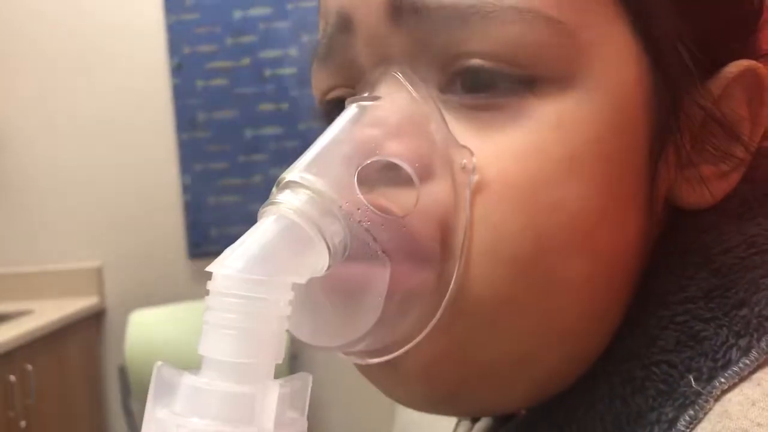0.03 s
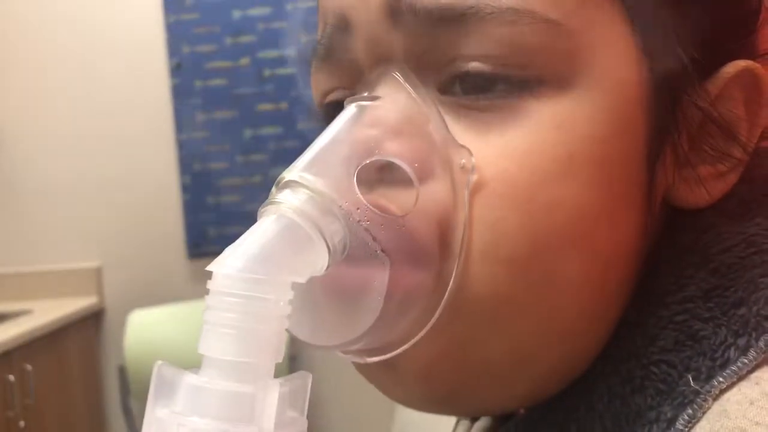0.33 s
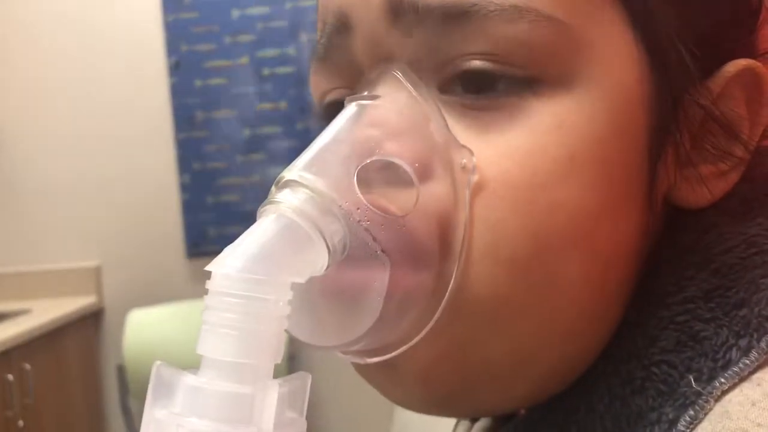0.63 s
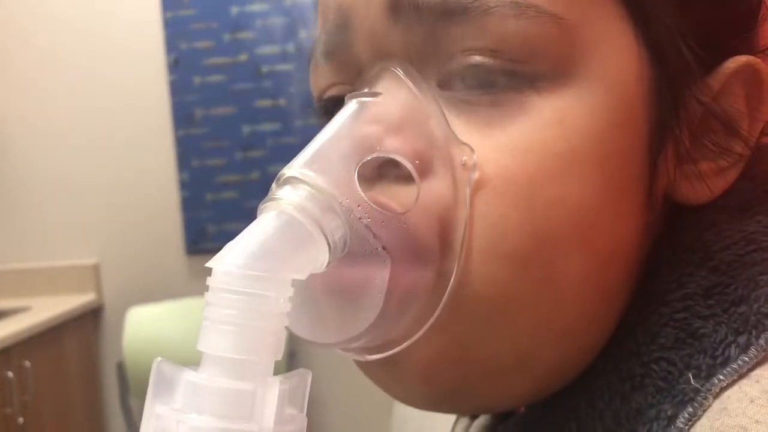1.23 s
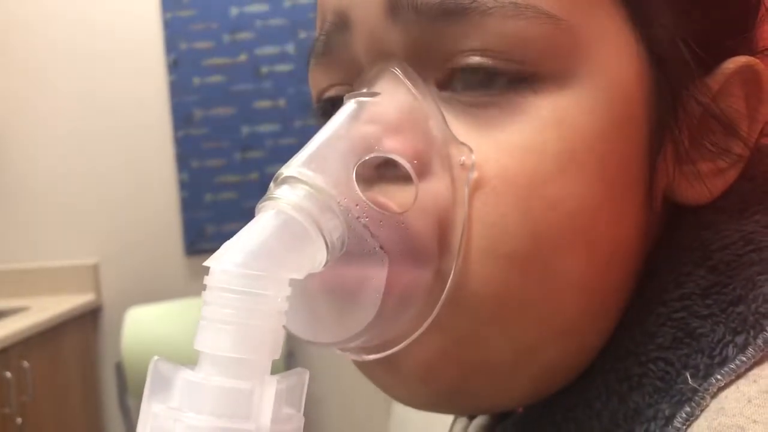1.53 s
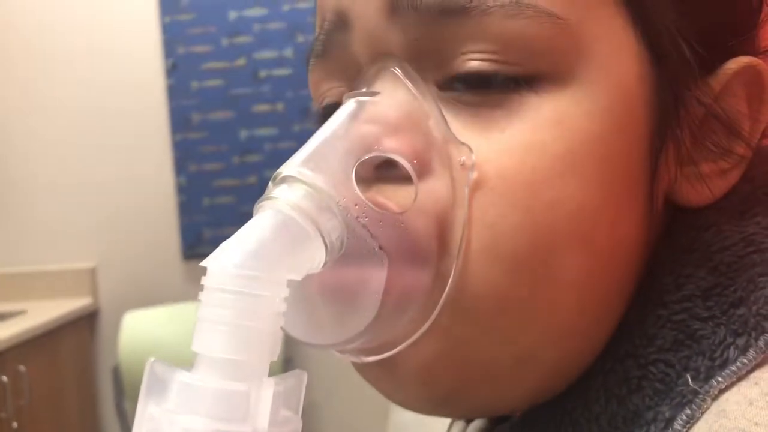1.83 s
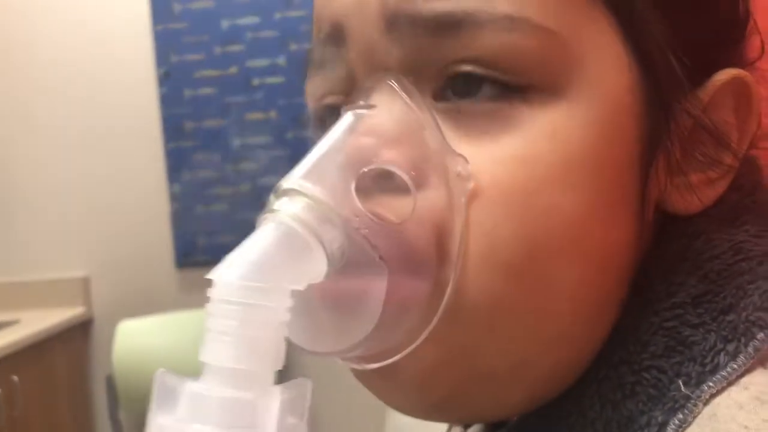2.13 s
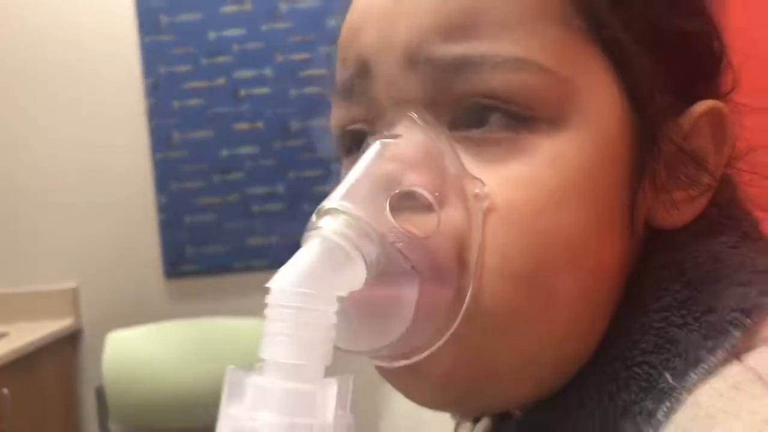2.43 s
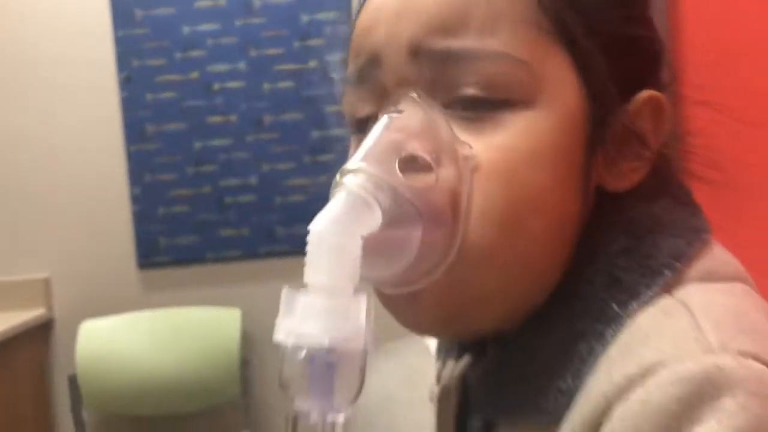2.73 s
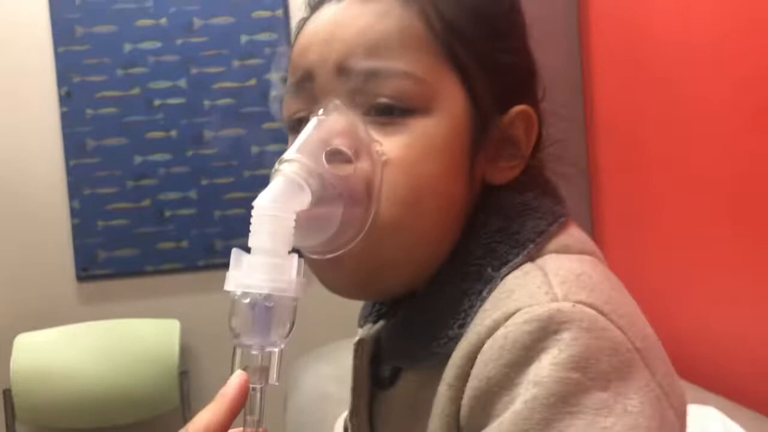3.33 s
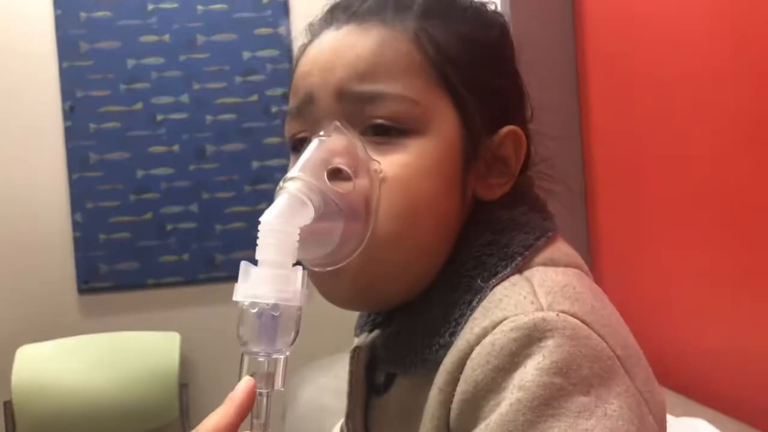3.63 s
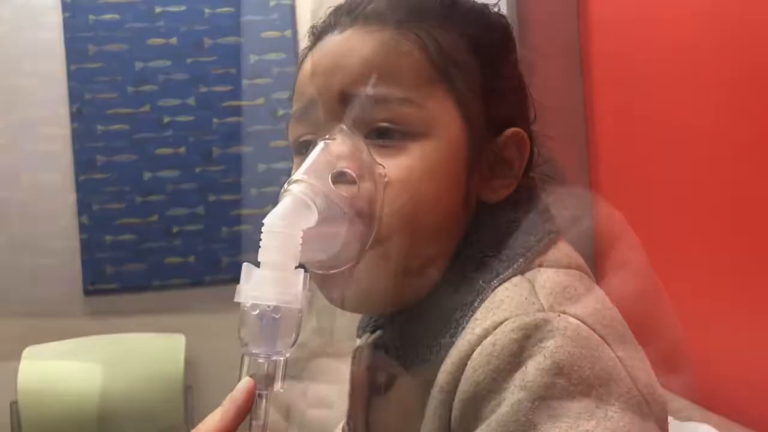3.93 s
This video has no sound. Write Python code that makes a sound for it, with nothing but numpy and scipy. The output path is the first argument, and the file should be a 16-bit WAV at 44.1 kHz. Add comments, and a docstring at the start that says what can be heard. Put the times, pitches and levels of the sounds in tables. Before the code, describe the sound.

A nebulizer runs in a small room, its compressor humming and buzzing while air sputters and hisses through the medicine cup and mask. Past the middle the microphone draws back, so the hum changes tone and the hiss softens.

```python
"""A nebulizer runs in a small room. From the start its piston pump hums and buzzes at a steady speed,
while a jet of air sputters in the medicine cup and hisses through cup and mask.
Twice, before two seconds are up, the hand holding the microphone rumbles faintly.
Past the middle the microphone draws back: the hum changes colour and the hiss softens.
Near the end the hand rumbles again and the hum stumbles briefly."""
import sys
import numpy as np
from scipy import signal
from scipy.fft import rfft, irfft
from scipy.io import wavfile

SR = 44100
rng = np.random.default_rng(int(sys.argv[2]) if len(sys.argv) > 2 else 0)


def generate_wav(signal):
    """Clip the signal to [-1, 1] and save it as 16-bit WAV at the path in sys.argv[1]."""
    frames = np.transpose(np.atleast_2d(signal))
    scaled = np.clip(frames, -1, 1) * 32767
    pcm = np.round(scaled).astype(np.int16)
    wavfile.write(sys.argv[1], SR, pcm)


N = 176400
TIME, FREQS = np.arange(N) / SR, np.arange(N // 2 + 1) * SR / N

# The hum near the mask and further back. Each row: multiple of the stroke rate, dB added to the base.
HUM_NEAR_TONES = [(1, -8.5), (2, -2.5), (3, -16), (4, -23.5), (5, -7.5), (6, -8.5), (7, -24), (8, -12.5),
                  (9, -15), (10, 0.5), (11, -10.5), (12, 1), (13, -8), (14, -4.5), (15, -22), (16, -7),
                  (17, -13), (18, -17), (19, -8.5), (20, -7), (21, -20), (22, -3.5), (23, -12), (24, -5),
                  (25, -17), (26, -32.5), (27, -14), (28, -22.5), (29, -16), (30, -16.5), (31, -14),
                  (32, -20.5)]
HUM_FAR_TONES = [(1, -14), (2, -11), (3, -12.5), (4, -20.5), (5, -12.5), (6, -17.5), (7, -26), (8, -23),
                 (9, -8.5), (10, 0.5), (11, -21), (12, -16.5), (13, -23), (14, -17.5), (15, -20.5),
                 (16, -14.5), (17, -11.5), (18, -8.5), (19, -15), (20, -12.5), (21, -13.5), (22, -14.5),
                 (23, -30), (24, -19), (25, -16), (26, -41), (27, -26), (28, -19), (29, -32), (30, -20),
                 (31, -22), (32, -32.5)]
NEAR_BASE_DB, FAR_BASE_DB = -44.5, -37.5
TONE_FLUTTER, HUM_FLUTTER = .08, .028   # unsteadiness of each tone and of the whole hum
# The pump's speed, and three strong tones that stand in the room and follow their own levels instead.
# Each row: time in seconds, strokes per second, then the level in dB of each of the three.
SPEED_AND_STANDING_TONES = [(0, 52.13, -44.5, -45, -48), (.4, 52.16, -43.5, -44, -48.5),
                            (2.25, 52.13, -43.5, -44.3, -48), (2.45, 52.15, -41.5, -43.5, -52),
                            (2.7, 52.15, -37.3, -46.5, -61), (3.05, 52.15, -36.8, -54, -53),
                            (3.55, 52.13, -37.6, -51, -56), (4, 52.15, -36.3, -50, -53)]
STANDING_MULTIPLES = (10, 12, 14)
# How much echoes smear each knock. Each row: pitch in Hz, spread of phase in radians.
ECHO_SMEAR = [(50, 1.5), (250, 2.2), (700, 2.0), (850, .95), (1300, .95), (1700, 1.6)]


def piston_hum(crank, away, stroke_hz, standing_db):
    """Each stroke knocks once; the room makes each tone's level and delay depend on where one listens."""
    standing = dict(zip(STANDING_MULTIPLES, standing_db))
    out = 0
    for (k, near_db), (_, far_db) in zip(HUM_NEAR_TONES, HUM_FAR_TONES):
        smear, turn = rng.standard_normal(2)
        usual_db = (1 - away) * (NEAR_BASE_DB + near_db) + away * (FAR_BASE_DB + far_db)
        echo_phase = at_hz(ECHO_SMEAR, k * stroke_hz) * (smear + .5 * turn * away)
        angle = k * crank + echo_phase + TONE_FLUTTER * drift(13)
        out -= tone(standing.get(k, usual_db), angle) * (1 + TONE_FLUTTER * drift(16))
    return out * (1 + HUM_FLUTTER * drift(41))


# The buzz above the hum. Each row: pitch in Hz, typical level of one tone in dB.
BUZZ_LEVELS = [(1700, -63), (2050, -69.5), (2550, -71.5), (2800, -76), (3100, -69), (3500, -79.5),
               (4000, -84)]
WHINE_MULTIPLE, WHINE_NEAR_DB, WHINE_FAR_DB = 57, -64, -80


def valve_buzz(crank, away, stroke_hz, count=44, uneven_db=3.6, flutter=.25):
    """The valves add uneven, restless high tones; the motor whines thinly among them."""
    out = tone((1 - away) * WHINE_NEAR_DB + away * WHINE_FAR_DB, WHINE_MULTIPLE * crank)
    for k in len(HUM_NEAR_TONES) + 1 + np.arange(count):
        near, far, smear = rng.standard_normal(3)
        level_db = at_hz(BUZZ_LEVELS, k * stroke_hz) + uneven_db * ((1 - away) * near + away * far)
        out += tone(level_db, k * crank + np.pi * smear + flutter * drift(11))
    return out


# The plain hiss, before cup and mask colour it. Each row: pitch in Hz, near and far level in dB per Hz.
JET_COLOUR = [(1500, -100, -102), (2580, -89.5, -93), (3960, -96.5, -97.5), (4830, -84, -90.5),
              (6440, -88.5, -91.5), (8500, -90, -92.5), (9470, -85, -88.5), (11200, -87, -91.5),
              (13700, -87.5, -92.5), (16000, -88, -92)]
# Where cup and mask ring. Each row: pitch and half width in Hz, then near, far and extra halfway dB lift.
CUP_RESONANCES = [(2580, 60, 11, -3, -2), (4370, 100, 6, 6.5, 2.5), (5437, 317, 9, 10.5, 0.5),
                  (5822, 187, 11, 5, -1.5), (6320, 99, 2, 3.5, 4.5), (7140, 280, 5, -1.5, -6.5),
                  (8844, 150, 11, 13.5, 1.5), (9690, 270, 6.5, 0.5, -4), (10430, 200, 5, 5.5, 0),
                  (11870, 280, 3.5, 1.5, 0), (12800, 190, -3, 5.5, 11), (13230, 130, 7.5, 5, 0)]
# Liquid spitting in the jet. Each row: low and high edge of a band in Hz, its flicker in dB.
SPUTTER_BANDS = [(980, 4200, 0.7), (4220, 6800, 1.45), (6844, 9200, 1.5), (9330, 10850, 2),
                 (10970, 17000, 0.7)]
SPUTTER_HZ = 52
# How the hiss rises and falls. Each row: time in seconds, boost in dB.
JET_SWELL = [(0, 1), (.6, 0.6), (1.2, 0), (2.0, 0.76), (2.55, 0.5), (2.9, 1), (3.25, 1.5), (3.5, 0.5),
             (4, 1)]


def air_jet(away):
    """The jet hisses through cup and mask; droplets make each band flicker, partly together."""
    near_db, far_db = at_hz(JET_COLOUR, FREQS), at_hz(JET_COLOUR, FREQS, column=2)
    halfway_db = 0
    for hz, width, near_lift, far_lift, extra_lift in CUP_RESONANCES:
        bell = np.exp(-.5 * ((FREQS - hz) / width) ** 2)
        near_db += near_lift * bell
        far_db += far_lift * bell
        halfway_db += extra_lift * bell
    near, halfway, far = noise(near_db), noise((near_db + far_db) / 2 + halfway_db), noise(far_db)
    first_half = blend(near, halfway, 2 * away)
    spectrum = rfft(blend(first_half, far, 2 * away - 1))
    together, out = drift(SPUTTER_HZ), 0
    for low, high, flicker_db in SPUTTER_BANDS:
        band = irfft(spectrum * (FREQS >= low) * (FREQS < high), N)
        out += band * from_db(flicker_db * (.25 * together + .98 * drift(SPUTTER_HZ)))
    return out * from_db(in_time(JET_SWELL))


# The nozzle's shrill hiss. Each row: pitch in Hz, near and far base level in dB per Hz.
NOZZLE_COLOUR = [(13000, -110, -110), (14000, -88, -87), (14430, -75, -73), (14950, -68, -71),
                 (14900, -71.5, -69), (15460, -67, -78), (15650, -66, -73), (15900, -68, -78)]
# How it rises and falls. Each row: time in seconds, change of level in dB.
NOZZLE_SWELL = [(0, -4), (.35, -3.5), (.55, 0), (1.1, 0), (1.4, -2.5), (1.8, .5), (2.25, -0.5), (2.42, 3),
                (2.6, 2.5), (2.74, 5), (2.95, -.5), (3.5, 1), (4, 1)]


def nozzle(away, flicker_db=.8):
    """A narrow, very high hiss swells as the microphone passes through its beam."""
    change_db = in_time(NOZZLE_SWELL) + flicker_db * drift(SPUTTER_HZ)
    return near_far_noise(NOZZLE_COLOUR, away) * from_db(change_db)


# The motor's cooling air in the room. Each row: pitch in Hz, near and far level in dB per Hz.
AIR_COLOUR = [(20, -76, -85), (45, -84, -81), (80, -76, -78), (170, -76, -78.5), (260, -78.5, -78),
              (370, -81, -84), (470, -81, -78), (560, -73, -77), (700, -77.5, -83), (900, -83, -80),
              (1100, -81, -80), (1300, -81.5, -85), (2000, -83.5, -86), (2700, -86.5, -90),
              (3700, -96, -99), (6000, -110, -112)]
# Faint tones in the room. Each row: pitch in Hz, level in dB.
ROOM_TONES = [(172.3, -56), (226.1, -61.5)]


def motor_air(crank, away, throb=.3, waver=.42):
    """A soft rush of air throbs with the piston, beside two faint wavering tones."""
    out = near_far_noise(AIR_COLOUR, away) * (1 + throb * np.cos(crank))
    for hz, db in ROOM_TONES:
        strength = 1 + waver * drift(8.5)
        out += strength * tone(db, 2 * np.pi * hz * TIME + waver * drift(3))
    return out


# The hand shifts its grip. Each row: start in seconds, fade time in seconds, level in dB.
GRIP_SHIFTS = [(1.24, .1, -48), (1.92, .07, -47), (3.28, 0.28, -44), (3.6, .4, -50), (3.93, .08, -42)]
# The colour of its rumble. Each row: pitch in Hz, relative level in dB.
RUMBLE_COLOUR = [(25, -25), (55, -6), (85, 4), (170, -6), (300, -24), (700, -58)]


def hand_rumble(rise_s=.025):
    """The hand that holds the microphone makes short, dull rumbles."""
    rumble = noise(at_hz(RUMBLE_COLOUR, FREQS))
    swell = 0
    for start, fade_s, db in GRIP_SHIFTS:
        swell += from_db(db) * np.interp(TIME, [start, start + rise_s, start + rise_s + fade_s], [0, 1, 0])
    return swell * rumble / rumble.std()


# Faint low stereo noise. Each row: pitch in Hz, level in dB per Hz.
STEREO_NOISE_COLOUR = [(25, -104), (120, -98), (300, -88.5), (550, -100), (800, -125), (1500, -150)]


def faint_stereo_noise():
    """Faint low stereo noise that differs between the ears."""
    return noise(at_hz(STEREO_NOISE_COLOUR, FREQS))


def from_db(db):
    """Turn decibels into a gain."""
    return 10 ** (np.asarray(db) / 20)


def tone(db, angle):
    """A pure tone with this average (rms) level."""
    return np.sqrt(2) * from_db(db) * np.cos(angle)


def in_time(rows, column=1):
    """Read a table of times at every sample."""
    rows = np.array(rows)
    return np.interp(TIME, rows[:, 0], rows[:, column])


def at_hz(rows, hz, column=1):
    """Read a table of pitches, with octaves evenly spaced."""
    rows = np.array(rows)
    return np.interp(np.log(hz + 1e-9), np.log(rows[:, 0]), rows[:, column])


def drift(rate):
    """A smooth random wobble of spread 1 that changes about rate times a second."""
    pole = np.exp(-80 * np.pi * rate / SR)
    slow = signal.lfilter([1], [1, -2 * pole, pole * pole], rng.standard_normal(N // 40 + 2002))[2000:]
    return np.interp(np.arange(N) / 40, np.arange(len(slow)), slow / slow.std())


def noise(density_db):
    """Noise with the given dB per Hz."""
    return irfft(rfft(rng.standard_normal(N)) * from_db(density_db) * np.sqrt(SR / 2), N)


def blend(near, far, away):
    """Fade between two noises without a dip in power."""
    share = np.clip(away, 0, 1)
    return np.sqrt(1 - share) * near + np.sqrt(share) * far


def near_far_noise(rows, away):
    """Noise that fades from a table's near colour to its far one."""
    return blend(noise(at_hz(rows, FREQS)), noise(at_hz(rows, FREQS, column=2)), away)


# The microphone draws back. Each row: time in seconds, how far away (0 is near, about 1 is far).
MICROPHONE_PATH = [(0, 0.07), (2.3, 0.03), (2.6, 0.24), (2.85, 0.7), (3.1, 0.9), (4, 1.04)]
SPEED_WANDER = .0003   # as a share of the motor's speed
STUMBLE_START_S, STUMBLE_LENGTH_S, STUMBLE_STROKES = 3.845, .018, .025   # the hum skips part of a stroke


def scene():
    """One turning crank drives hum, buzz and throb; only a faint low noise differs between the ears."""
    away = in_time(MICROPHONE_PATH)
    stroke_hz, *standing_db = [in_time(SPEED_AND_STANDING_TONES, column) for column in (1, 2, 3, 4)]
    strokes = np.cumsum(stroke_hz * (1 + SPEED_WANDER * drift(3.85))) / SR
    skip = STUMBLE_STROKES * np.clip((TIME - STUMBLE_START_S) / STUMBLE_LENGTH_S, 0, 1)
    crank = 2 * np.pi * (strokes + skip)   # angle in radians, one turn a stroke
    hum = piston_hum(crank, away, stroke_hz.mean(), standing_db)
    pump = hum + valve_buzz(crank, away, stroke_hz.mean()) + motor_air(crank, away)
    centre = pump + air_jet(away) + nozzle(away) + hand_rumble()
    side = faint_stereo_noise()
    return np.array([centre + side, centre - side])


def record(dry):
    """The very highest treble is cut off steeply."""
    cutoff_hz, slope_width_hz = 15750, 120
    return irfft(rfft(dry) * np.clip((cutoff_hz - FREQS) / slope_width_hz + .5, 0, 1), N)


dry = scene()
out = record(dry)
generate_wav(out)
```